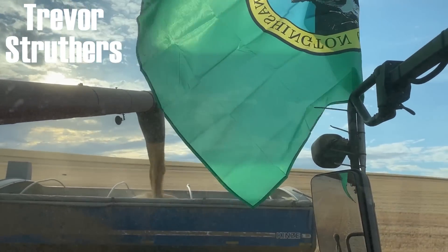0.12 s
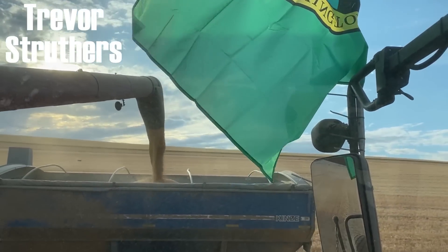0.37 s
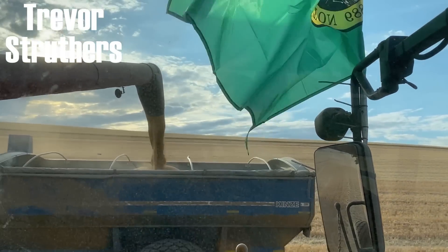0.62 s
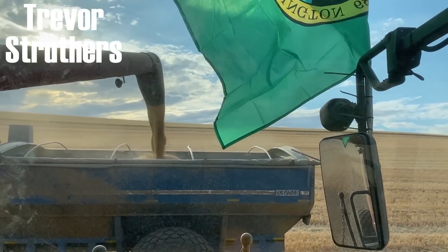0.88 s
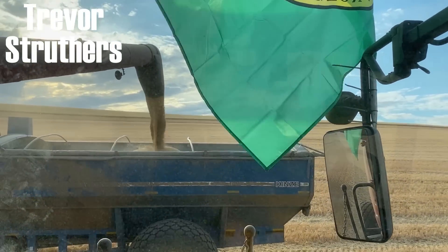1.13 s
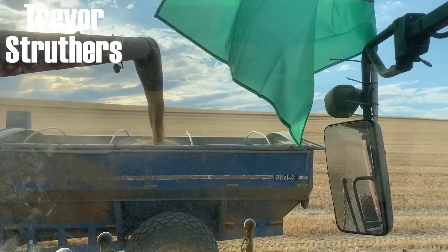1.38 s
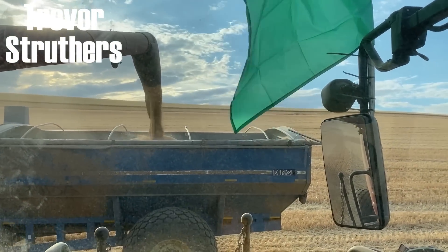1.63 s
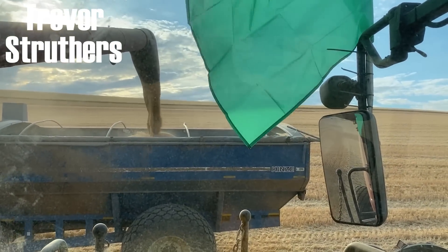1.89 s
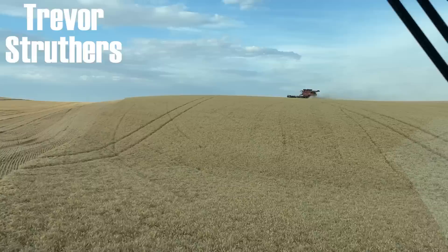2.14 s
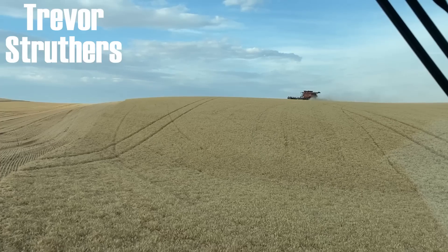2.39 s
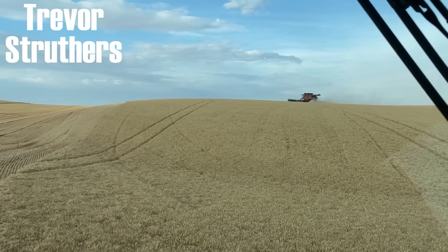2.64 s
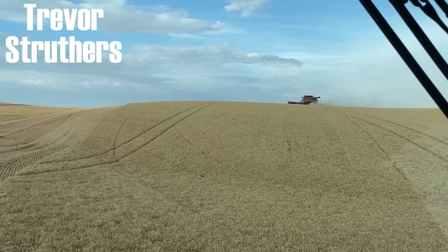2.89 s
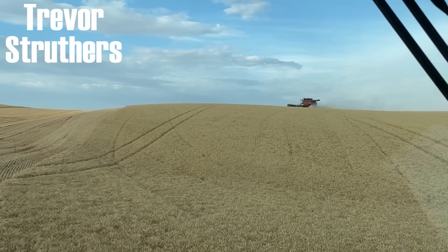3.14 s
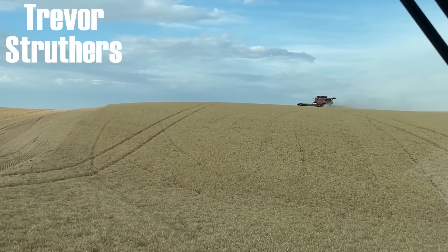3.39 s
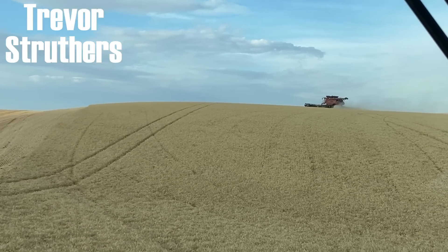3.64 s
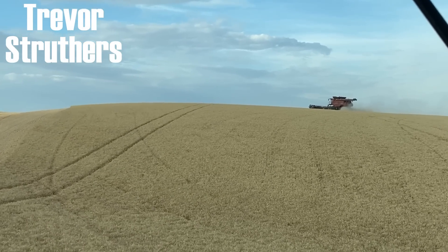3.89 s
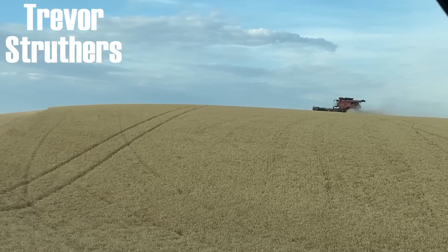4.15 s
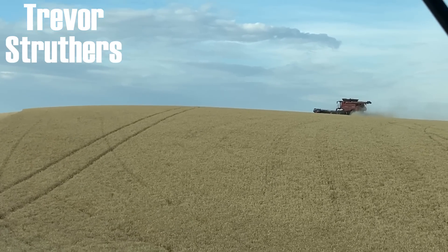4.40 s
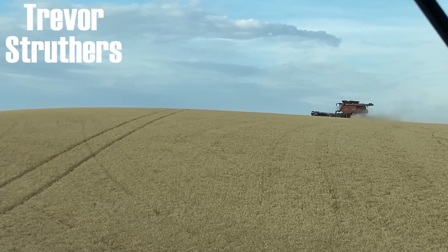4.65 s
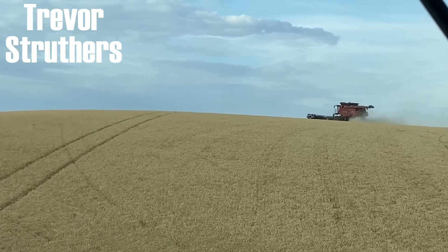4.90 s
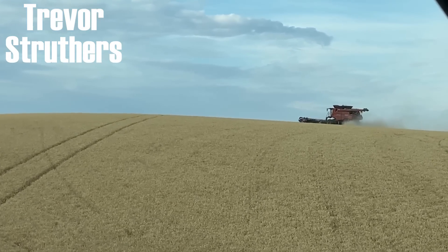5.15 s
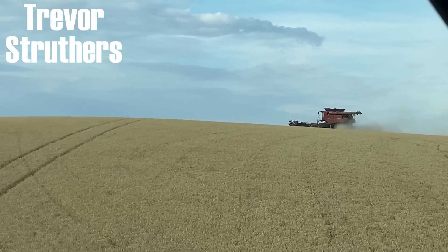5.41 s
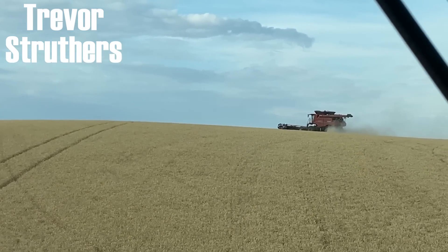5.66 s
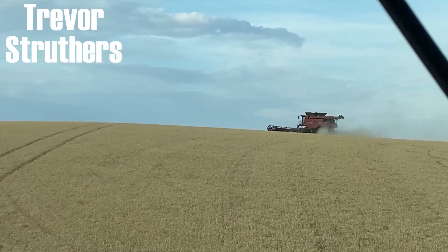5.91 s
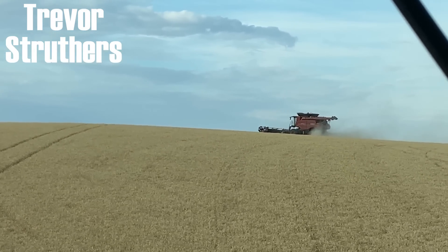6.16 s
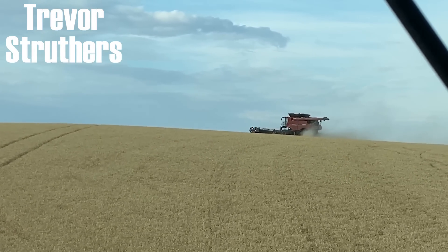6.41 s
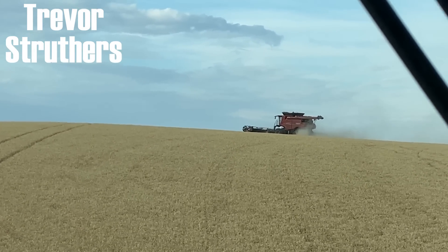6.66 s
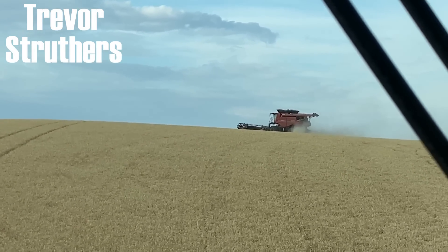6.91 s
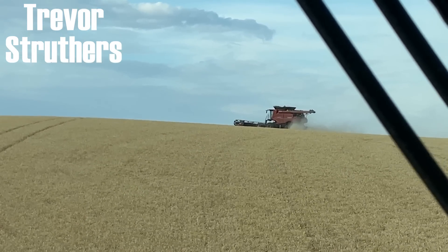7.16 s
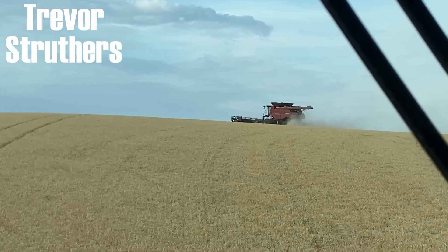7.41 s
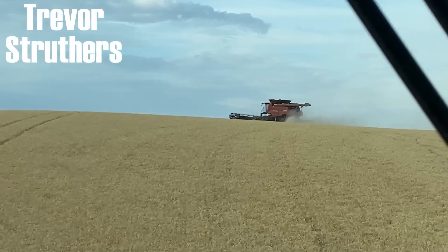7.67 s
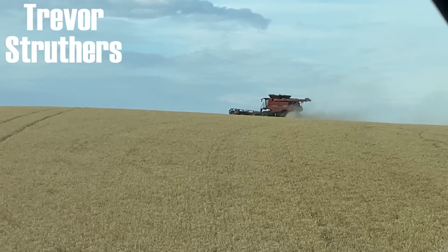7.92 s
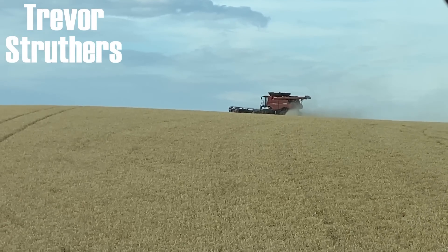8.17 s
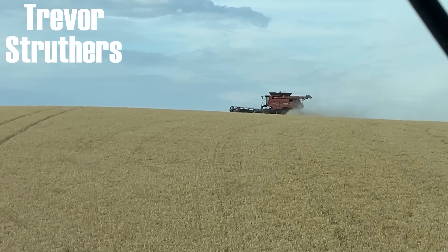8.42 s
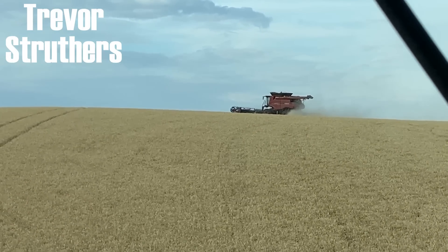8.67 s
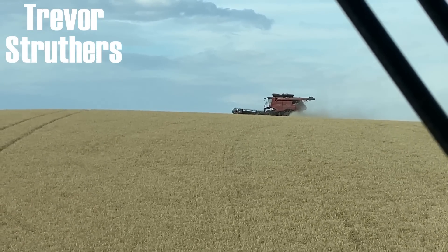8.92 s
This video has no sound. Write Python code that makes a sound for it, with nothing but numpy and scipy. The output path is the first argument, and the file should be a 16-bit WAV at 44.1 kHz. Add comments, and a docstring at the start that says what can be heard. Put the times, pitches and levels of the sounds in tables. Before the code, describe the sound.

A continuous, bass-heavy engine hum fills an enclosed farm machine cab, with a strained hydraulic tone that soon eases and two very faint ticks. An abrupt click switches to a stronger drone whose deep boom swells and sags, with more crop-flow hiss, wavering gear whine and small rubbing squeaks. Near the end loose trim gives a quick thumping rattle. The stereo microphone sits inside the cab; the sound stops without winding down.

```python
"""A deep engine drone with whines, rumble and hiss fills a combine harvester's cab; a click leads to a louder passage.
First the machine stands and unloads grain; after a hard edit it harvests, with more squeaks and knocks of loose trim.
The six-cylinder diesel, belt-driven shafts, gears and pumps are sines that follow the crank speed.
Filtered noise makes the rumble and hiss; short rings make the knocks, and short bands of noise the squeaks."""
import sys
import numpy as np
from scipy import signal
from scipy.fft import rfft, irfft, next_fast_len
from scipy.io import wavfile
from scipy.ndimage import map_coordinates

SR = 44100
rng = np.random.default_rng(int(sys.argv[2]) if len(sys.argv) > 2 else 0)


def elevation(decibels):
    """Turn decibel levels (scalar or array-like) into linear amplitude ratios."""
    levels = np.asarray(decibels, float)
    return 10 ** (levels / 20)


def put_to_file(sound):
    """Save the sound as 16-bit audio at rate SR, in the file named by the first command-line argument."""
    columns = np.atleast_2d(sound).T  # one column per channel
    safe = np.clip(columns, -1, 1)
    whole_steps = np.round(safe * 32767)
    wavfile.write(sys.argv[1], SR, whole_steps.astype(np.int16))


N = 399105
EDIT_S = 2.1975   # unloading (part 0) ends and harvesting (part 1) begins
# crank speed, steady while unloading, then the governor hunts a little under load: (time [s], speed [turns/s])
CRANK_SPEED = [(0, 34.93), (2.19, 34.93), (2.4, 34.99), (2.75, 34.56), (3.3, 34.7), (3.6, 34.75),
               (4.25, 35.0), (5.1, 34.86), (6.0, 34.83), (6.75, 35.07), (7.2, 34.82), (7.85, 34.62),
               (8.45, 34.84), (9.05, 34.84)]


def rms_one(x):
    """Scale to unit rms."""
    return x / np.sqrt(np.mean(x ** 2) + 1e-20)


def in_time(rows, t):
    """Columns of a curve at the times t."""
    s, *columns = np.transpose(rows)
    return [np.interp(t, s, c) for c in columns]


def at_hz(rows, hz):
    """Columns of a table at the pitches hz, joined by straight lines over log pitch."""
    f, *columns = np.transpose(rows)
    return [np.interp(np.log(hz + 1), np.log(f), c) for c in columns]


def ramp(t, at_s, length_s):
    """Rises from 0 to 1 over length_s, centred on at_s."""
    return np.clip((t - at_s) / length_s + .5, 0, 1)


def drift(rate, size):
    """Slow random wandering of rms 1: 2 * rate random knots per second, joined smoothly."""
    knots = rng.standard_normal(int(size / SR * 2 * rate) + 4)
    places = 1 + np.arange(size) * 2 * rate / SR
    return rms_one(map_coordinates(knots, [places], order=2))


def band_pass(x, low_hz, high_hz):
    """Keep mainly the sound between two pitches."""
    return signal.sosfilt(signal.butter(2, [low_hz, high_hz], "band", fs=SR, output="sos"), x)


def microphones(part, hz):
    """Two spaced microphones: likeness, phase lead of the right side and left-right balance at a pitch."""
    # one table for unloading, one for harvesting:
    # (pitch [Hz], likeness [0-1], lead of the right side [radians], left over right [dB])
    stereo_image = [
        [(50, 1, -0.6, -1.5), (100, 0.97, 0.5, 0.5), (200, 0.97, 0.27, 1), (320, 0.65, 1, -1.3),
         (420, 0.7, 0.1, -1.5), (540, 0.1, 1.2, 0.5), (700, 0.4, 4.5, 2), (930, 0, 6, 0), (1300, 0.7, 4, -0.5),
         (1800, 0, 6, -0.5), (3200, .4, 6.5, 3), (4000, 0.6, 5, 2.5), (5960, 0.1, 9.5, .6), (7230, .85, 4.5, 2),
         (8500, 1, 6, 0.5)],
        [(50, 0.97, 0.096, 0.8), (108, 1, 0.15, 0.1), (200, 0.91, 0, 0.1), (330, 0.88, -0.12, 0.9),
         (405, 1, 0.65, -2.5), (630, 0.45, .1, -1.9), (900, .43, -0.026, 0.7), (1300, .34, -1.6, -1),
         (1640, 0.4, -1.3, -2.5), (2000, 0.69, 0.37, -0.5), (3200, 0.94, -0.69, 0.5), (3800, 0.8, 0.12, 1),
         (5850, 0.3, 0.25, -0.5), (7200, 1, -0.28, 0.5), (8500, 1, -0.16, 0)],
    ]
    lead_from_hz, lead_s = 6880, 0.00024   # above this pitch the right side's lead grows further
    alike, lead, balance_db = at_hz(stereo_image[part], hz)
    lead = lead + 2 * np.pi * lead_s * np.maximum(hz - lead_from_hz, 0)
    return np.clip(alike, 0, 1), lead, balance_db


def squeaks(faint_width_hz, per_s, faint_db):
    """Rubbing trim: narrow bands of noise under a smooth swell; many faint ones come at random while harvesting."""
    # the clear squeaks: (time [s], length [s], pitch [Hz], width [Hz], level [dB])
    clear_squeaks = [(2.297, 0.036, 2400, 495, -46), (3.4, .11, 2020, 380, -42),
                     (3.882, 0.055, 1490, 150, -47), (5.887, 0.046, 1710, 120, -46),
                     (6.239, 0.036, 1730, 200, -45), (8.351, 0.03, 3720, 300, -50),
                     (8.494, .04, 2150, 200, -44)]
    out = np.zeros(N + SR)
    harvest_s = N / SR - EDIT_S
    faint = []
    for a, b, c, d in rng.random((round(per_s * harvest_s), 4)):
        start_s, length_s = EDIT_S + a * harvest_s, .02 + .04 * b
        # higher squeaks are fainter
        faint.append((start_s, length_s, 1300 * 3.5 ** c, faint_width_hz, faint_db - 9 * c + 6 * d))
    for s, length_s, hz, width_hz, level_db in clear_squeaks + faint:
        band = band_pass(rng.standard_normal(SR // 5), hz - width_hz / 2, hz + width_hz / 2)
        size = round(length_s * SR)
        out[round(s * SR):][:size] += elevation(level_db) * rms_one(band[-size:] * np.hanning(size))
    return out[:N]


def knocks():
    """Loose trim: each knock is a short dull ring with an equal lower mode, a soft start and a puff of noise."""
    # (time [s], level [dB], upper ring [Hz])
    trim_knocks = [(1.356, -37, 856), (1.358, -40, 1400), (7.618, -24, 550), (7.665, -34.5, 780),
                   (7.688, -14.5, 543), (7.703, -24, 797), (7.731, -27, 950), (7.741, -34, 855)]
    t60_s, lower_mode, puff_db = 0.033, .6, -14   # time to fall by 60 dB, lower pitch over upper, puff level
    out, t = np.zeros(N), np.arange(SR // 10) / SR
    shape = np.exp(-np.log(1000) * t / t60_s) * (1 - np.exp(-t / .0015))
    shape = shape / shape.max()
    for s, knock_db, hz in trim_knocks:
        ring = np.sin(2 * np.pi * hz * t) + np.sin(2 * np.pi * lower_mode * hz * t)
        puff = rms_one(band_pass(rng.standard_normal(len(t)), hz / 2, 1.5 * hz))
        out[round(s * SR):][:len(t)] += elevation(knock_db) * shape * (ring + elevation(puff_db) * puff)
    return out


def machine_noise(part, t, patchy_db):
    """Machine noise through the cab walls: coloured noise in five layers, with treble bands that flicker."""
    # colour within each layer: (pitch [Hz], unloading [dB], harvesting [dB])
    wall_colour = [(20, -71, -68), (30, -51, -48.5), (47, -54.5, -47.5), (59.6, -43.5, -40),
                   (94, -42.5, -31.5), (120.4, -40, -34), (132.8, -47.5, -43.5), (200, -42.5, -43.5),
                   (221, -51.5, -49), (474, -61, -59.5), (1050, -75.5, -72.5), (2400, -83.5, -77.5),
                   (3620, -93, -84.5), (6050, -100, -91.5), (14000, -116, -104), (15800, -138, -122)]
    # cab panels that lift or dip the colour: (pitch [Hz], width [Hz], lift unloading [dB], lift harvesting [dB])
    cab_panels = [(424, 80, 3.5, 5), (628.5, 25, 7.5, 4.5), (738, 13, -5, 7.9), (877, 33, 2.5, 4.5),
                  (1230, 110, 3.5, 2.2), (1704, 29, -3, 6), (2046, 220, -1, 3.6), (2300, 250, 6, 0.88),
                  (2914, 50, 3, 3), (3980, 99, 4.5, 1), (4500, 100, 2.5, 1.7), (4800, 100, 2, 3.3)]
    # boom, drone, growl, clatter, hiss: (from [Hz], to [Hz], level set from [Hz], level set to [Hz])
    layer_ranges = [(10, 135, 30, 98), (135, 600, 135, 600), (600, 1100, 600, 1100),
                    (1100, 2500, 1100, 2500), (2500, 17000, 2500, 8000)]
    # same order: (unloading [dB], harvesting [dB], short of that at the start of harvesting [dB])
    layer_levels = [(-24.5, -19.5, -1), (-28.5, -24, 0.5), (-48, -41.5, 2.5), (-51, -44, 0.4),
                    (-55.5, -47, 2.5)]
    build_up_s = 1.2   # time constant of the crop flow after the edit

    size = next_fast_len(len(t))
    hz = np.fft.rfftfreq(size, 1 / SR)
    colour_db = at_hz(wall_colour, hz)[part]
    for centre_hz, width_hz, *lift_db in cab_panels:
        colour_db = colour_db + lift_db[part] / (1 + (2 * (hz - centre_hz) / width_hz) ** 2)

    # the right side shares part of the left side's noise
    alike, lead, balance_db = microphones(part, hz)
    left, other = rfft(rng.standard_normal((2, size)))
    right = alike * np.exp(1j * lead) * left + np.sqrt(1 - alike ** 2) * other
    both = elevation(colour_db) * np.array([left * elevation(balance_db / 2), right * elevation(-balance_db / 2)])

    out = 0
    shake = drift(17.0, len(t))   # a shake of the cab moves all treble bands together
    for (low, high, from_hz, to_hz), (*steady_db, short_db) in zip(layer_ranges, layer_levels):
        level_db = steady_db[part] - part * short_db * np.exp(-(t - t[0]) / build_up_s)
        inside = (hz >= from_hz) & (hz < to_hz)
        norm = np.sqrt(2 * np.sum(abs(both.mean(0)[inside]) ** 2)) / size
        edges = np.geomspace(low, high, 2 if low < 600 else 5)   # the upper layers have four bands each
        for a, b in zip(edges, edges[1:]):
            band = irfft(both * ((hz >= a) & (hz < b)), size)[:, :len(t)] / norm
            flicker_db = patchy_db * (0.72 * shake + .7 * drift(14.0, len(t))) * (low >= 600)
            out = out + band * elevation(level_db + flicker_db)
    return out


def tone(part, turns, order, level_db, waver_db, wobble, flutter_db=0):
    """A sine at order times the crank speed, wavering in level and phase, placed between the microphones."""
    alike, lead, balance_db = microphones(part, order * CRANK_SPEED[0][1])
    # reflections shift the phase between the sides
    lead = lead + .15 * np.arccos(alike) * rng.choice([-1, 1])
    phase = 2 * np.pi * (order * turns + rng.random()) + wobble * drift(3.0, len(turns))   # wobble in radians
    sway_db = waver_db * drift(1.51, len(turns)) + flutter_db * drift(20.0, len(turns))
    level = np.sqrt(2) * elevation(level_db + sway_db)
    left = elevation(balance_db / 2) * np.sin(phase)
    right = elevation(-balance_db / 2) * np.sin(phase + lead)
    return level * np.array([left, right])


def whistle(part, t, turns):
    """A thin whistle locked to the crank rests low and swells for each spell."""
    # (start [s], length [s], level [dB])
    whistle_spells = [(3.4, 1.1, -61.5), (4.95, 2, -62), (7.8, 1.0, -61.5)]
    rest_db, fade_s = (-71.5, -74)[part], .25
    level_db = rest_db
    for s, length_s, spell_db in whistle_spells:
        present = ramp(t, s, fade_s) - ramp(t, s + length_s, fade_s)
        level_db = level_db + (spell_db - rest_db) * present
    return tone(part, turns, 126.44, level_db, waver_db=0.0, wobble=(.3, 1.0)[part], flutter_db=1.5)


def gear_whine(part, t, turns):
    """Gears whine at a fixed multiple of the crank speed."""
    # one curve for unloading, one for harvesting: (time [s], level [dB])
    whine_levels = [
        [(0, -64.5), (1.4, -65), (2.19, -58)],
        [(2.2, -62), (3, -51.5), (4.4, -57.5), (6, -56), (6.8, -52), (7.4, -55), (7.8, -47.5), (9.05, -47)],
    ]
    level_db = in_time(whine_levels[part], t)[0]
    return tone(part, turns, 58.11, level_db, waver_db=0.2, wobble=(.3, .7)[part], flutter_db=2.0)


def hydraulic_pump(part, t, turns):
    """The hydraulic pump's tone strains at first, then eases off; it is lower still while harvesting."""
    straining_db, eased_db, harvesting_db = -47.5, -55.5, -63.5
    easing = ramp(t, .5, .2)
    level_db = harvesting_db if part else straining_db + (eased_db - straining_db) * easing
    return tone(part, turns, 26.63, level_db, waver_db=0.5, wobble=0.26)


def fan(part, t, turns):
    """A fan hums at a fixed multiple of the crank speed and swells slowly."""
    # one curve for unloading, one for harvesting: (time [s], level [dB])
    fan_levels = [
        [(0, -45), (.9, -46), (1.4, -39.5), (2.19, -41.5)],
        [(2.2, -45), (4.6, -35.5), (7, -41), (7.8, -37.5), (9.05, -41)],
    ]
    level_db = in_time(fan_levels[part], t)[0]
    return tone(part, turns, 12.45, level_db, waver_db=1.5, wobble=0.3, flutter_db=2.5)


def shafts_and_cylinders(part, turns):
    """Uneven cylinders sound at half-turn steps; belts, shafts, pumps and fans turn at their own ratios."""
    # cylinders: (multiple of crank speed), then (unloading [dB], harvesting [dB])
    cylinder_orders = [1, 1.5, 2.5, 4, 4.5, 6, 6.5, 7.5, 10, 12, 13.5, 18, 24]
    cylinder_levels = [(-46, -36.5), (-34, -37.5), (-38.5, -25.5), (-34, -47), (-44.5, -37), (-39, -42),
                       (-40.5, -53), (-62.5, -42.5), (-54.5, -55.5), (-50.5, -39.5), (-63, -52), (-57, -59),
                       (-67, -62.5)]
    # driven parts: (multiple of crank speed), then (unloading [dB], harvesting [dB])
    driven_orders = [.886, 1.457, 1.771, 2.914, 3.09, 4.375, 5.7, 5.83, 7.755, 9.16, 9.72, 10.17, 10.89,
                     11.44, 14.92, 16.95, 21.79, 29.8, 34.83, 53.28, 79.91, 341.2, 347.2]
    driven_levels = [(-46, -38.5), (-29, -28), (-44, -34), (-27, -38.5), (-45, -30.5), (-31, -47),
                     (-37, -36.5), (-33.5, -42.5), (-42, -32), (-46, -44.5), (-58, -38.5), (-50, -55.5),
                     (-68, -52.5), (-64, -47.5), (-52, -48.5), (-51, -59.5), (-63, -59), (-61.5, -60),
                     (-61, -58), (-69, -68), (-67.5, -77), (-94, -80), (-103, -81)]
    out = 0
    for order, level_db in zip(cylinder_orders + driven_orders, cylinder_levels + driven_levels):
        out = out + tone(part, turns, order, level_db[part], waver_db=1.36, wobble=(.2, .25)[part])
    return out


def firing(part, t, turns):
    """Six cylinders fire three times per crank turn, which makes the deep main tone that booms in the cab."""
    # one curve for unloading, one for harvesting: (time [s], level [dB])
    firing_levels = [
        [(0, -29.5), (2.19, -33)],
        [(2.2, -27), (2.6, -16), (3.2, -14), (3.9, -17), (6.2, -13.5), (7, -19.5), (7.8, -12), (8.5, -13),
         (9.05, -17)],
    ]
    level_db = in_time(firing_levels[part], t)[0]
    return tone(part, turns, 3, level_db, waver_db=0.63, wobble=0.041)


def turning_parts(part, t):
    """Everything that turns shares one crank: its turns are the speed added up over time."""
    turns = np.cumsum(in_time(CRANK_SPEED, t)[0]) / SR
    out = whistle(part, t, turns) + gear_whine(part, t, turns)
    out += hydraulic_pump(part, t, turns) + fan(part, t, turns)
    return out + shafts_and_cylinders(part, turns) + firing(part, t, turns)


def treble_width(x, t):
    """The left-right difference of two treble bands is turned up or down in steps."""
    # (from [Hz], to [Hz])
    treble_bands = [(2100, 3500), (3500, 7200)]
    # (from time [s], difference gain in the lower band [dB], in the upper band [dB])
    gain_steps = np.array([(2.2, 7.5, 2.5), (3.45, -3, -18), (7.7, -10.5, -17.5)])
    change = 0
    for k, band_hz in enumerate(treble_bands, start=1):
        gain_db = gain_steps[0, k]
        for s, jump_db in zip(gain_steps[1:, 0], np.diff(gain_steps[:, k])):
            gain_db = gain_db + jump_db * ramp(t, s, .25)
        band_filter = signal.butter(4, band_hz, "band", fs=SR, output="sos")
        side = signal.sosfiltfilt(band_filter, (x[0] - x[1]) / 2)
        change = change + (elevation(gain_db) - 1) * side
    return x + change * [[1], [-1]]


def scene():
    """Unloading and harvesting joined by a hard edit, with knocks and squeaks on top."""
    edit_step, edit_fade_s = -.37, 0.0037   # jump of the waveform at the edit and how fast it melts away
    t, cut = np.arange(N) / SR, round(EDIT_S * SR)
    before = machine_noise(0, t[:cut], patchy_db=.6) + turning_parts(0, t[:cut])
    after = machine_noise(1, t[cut:], patchy_db=.9) + turning_parts(1, t[cut:])
    after = treble_width(after, t[cut:])
    # the waveform jumps at the edit, heard as a click
    jump = before[:, -1:] + edit_step - after[:, :1]
    after += jump * np.exp(-(t[cut:] - t[cut]) / edit_fade_s)
    machine = np.hstack([before, after])
    placed_knocks = knocks() * elevation([[.5], [-.5]])   # slightly to the left
    return machine + placed_knocks + squeaks(faint_width_hz=95, per_s=14.0, faint_db=-58.5)


def low_pass(x):
    """Removes everything above the highest recorded frequency."""
    return signal.sosfilt(signal.butter(12, 16500, fs=SR, output="sos"), x)


def record(dry):
    """Both ends fade briefly and loud peaks are rounded a little."""
    t = np.arange(N) / SR
    edge_fade = np.minimum(np.minimum(t, t[::-1]) / .004, 1)
    mix = 1.083 * np.tanh(dry * edge_fade / 1.106)
    return low_pass(mix)


dry = scene()
out = record(dry)
put_to_file(out)
```